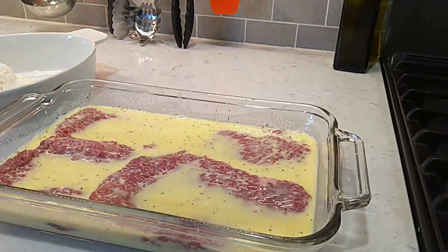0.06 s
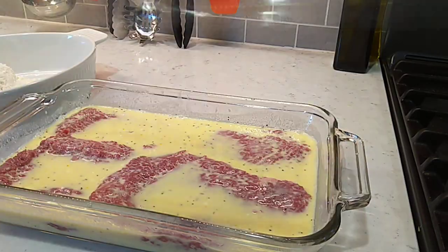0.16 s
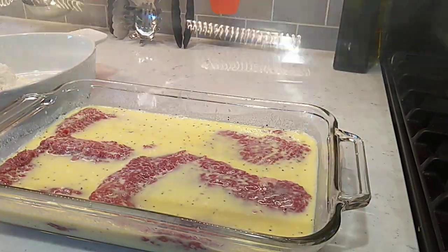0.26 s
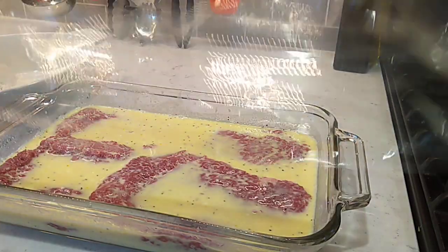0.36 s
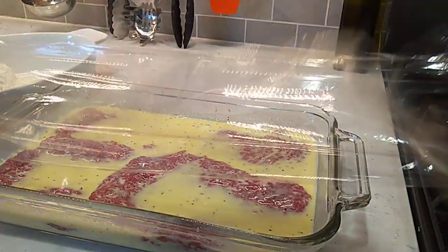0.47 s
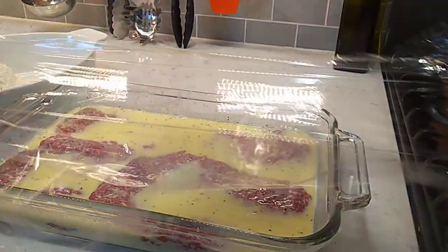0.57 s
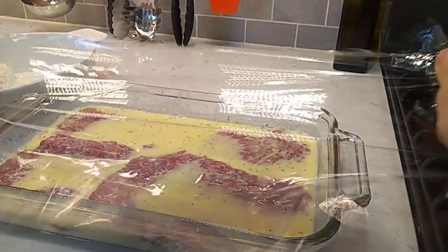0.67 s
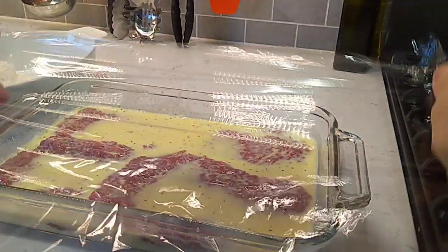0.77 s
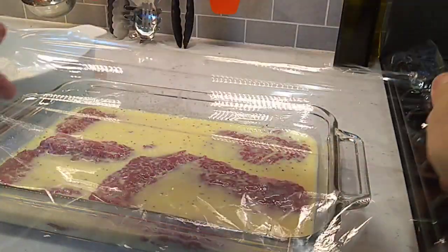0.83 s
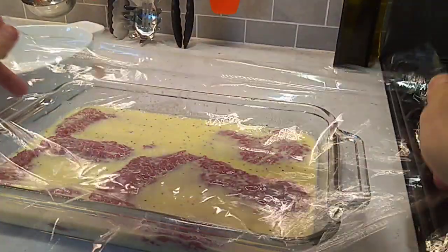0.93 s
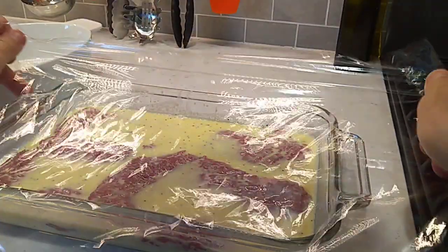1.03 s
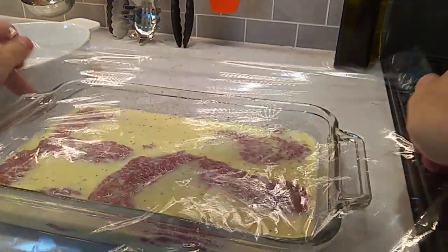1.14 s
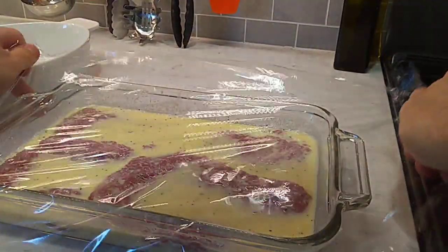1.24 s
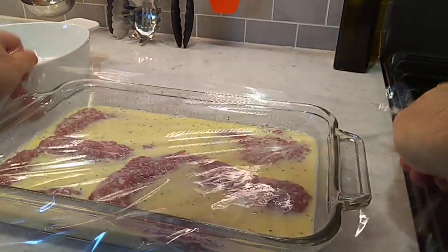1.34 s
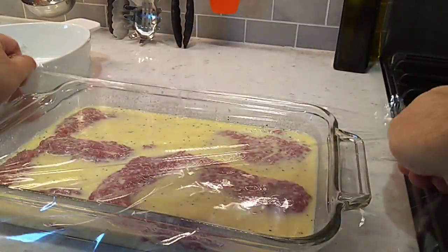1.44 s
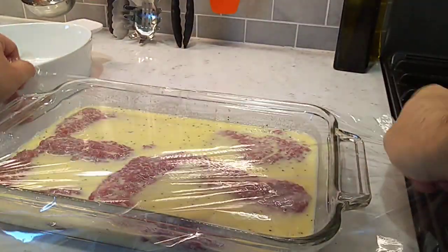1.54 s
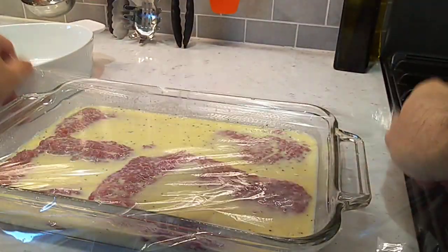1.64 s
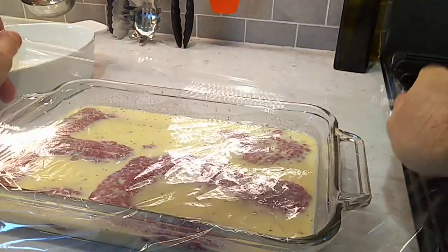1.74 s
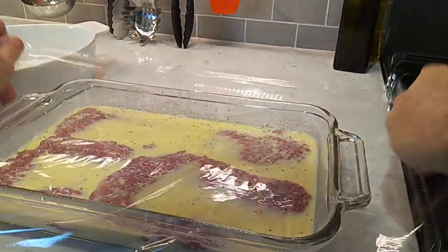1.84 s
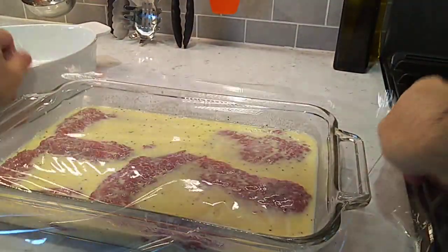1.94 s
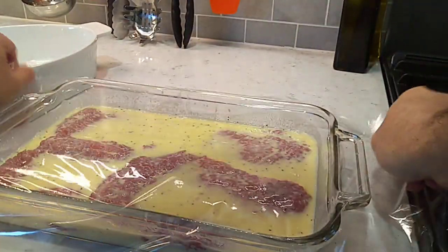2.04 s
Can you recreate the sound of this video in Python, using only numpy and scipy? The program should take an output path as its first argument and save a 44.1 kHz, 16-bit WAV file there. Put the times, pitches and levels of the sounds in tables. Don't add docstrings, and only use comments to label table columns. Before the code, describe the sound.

Plastic cling film crinkles with bright, fine fizz and dry snaps, close in stereo, over a low fridge hum in a hard kitchen. A sharp crack comes at 0.2 seconds, soft dish bumps at 0.4, 0.7 and 0.85, and denser crackling around 0.9-1.3 with a faint high whistle. A loud snap at 1.63 leads to crisp peels, a thud and hand scraping around 1.7-1.8, then lighter crackles until about 2 seconds.

```python
import sys
import numpy as np
from scipy import signal
from scipy.fft import rfft, irfft, next_fast_len
from scipy.io import wavfile
from scipy.ndimage import uniform_filter1d, map_coordinates

SR = 44100
rng = np.random.default_rng(int(sys.argv[2]) if len(sys.argv) > 2 else 0)


def to_linear_factor(level_db):
    exponent = np.asarray(level_db, float) / 20
    return 10 ** exponent


def transcribe(u):
    v = np.clip(np.atleast_2d(u).T, -1, 1)
    q = np.round(v * 32767).astype(np.int16)
    wavfile.write(sys.argv[1], SR, q)


N = 92610
T = np.arange(N) / SR

# (frequency [Hz], density [dB per Hz])
AIR_SPECTRUM = [(15, -36), (25, 4.5), (197, -3), (259, -2), (429, -3), (1050, -29), (1120, -24.5),
                (2880, -16), (6000, -18.5), (7800, -27), (13200, -120)]
# (frequency [Hz], left minus right [dB])
AIR_LEAN = [(60, -2), (240, 3.5), (950, 8.5), (3770, -2), (15000, 23)]
# (frequency [Hz], width [Hz], level [dB])
FRIDGE_HUM = [(59.7, 4.25, -62.5), (104, 12.3, -69.5), (203.5, 26, -65), (231.5, 22, -71.5),
              (313.5, 17, -66)]
# (frequency [Hz], correlation [-1..1])
MIC_LIKENESS = [(60, 0.5), (290, 0.97), (640, 0.4), (1400, 0), (15000, 0.0055)]
# (time [s], level [dB])
FILM_WORK = [(0.0, -51), (.06, -55), (0.15, -60), (.3, -58.5), (0.42, -56.5), (0.52, -65), (.68, -57),
             (.8, -61.5), (0.92, -52.5), (1.05, -49.5), (1.13, -51.5), (1.27, -52.5), (1.4, -59.5),
             (1.53, -59.5), (1.68, -53.5), (1.83, -55), (1.95, -56), (2.1, -52.5)]
# (frequency [Hz], density [dB per Hz])
FIZZ_SPECTRUM = [(880, -8), (1500, -13), (5640, -13.5), (6170, -8.5), (7540, -13), (13800, -0.5),
                 (15900, -15), (16500, -61)]
# (start [s], rise [s], hold [s], fall [s], level [dB], pitch [Hz])
SHUDDERS = [
    (0, .03, .08, 0.071, -67, 55.5),
    (0.208, 0.011, 0.017, .03, -56, 200),
    (1.713, 0.0091, 0.041, 0.066, -51.5, 240.8),
    (1.72, .04, .05, 0.042, -62, 69.9),
    (1.86, .05, 0.069, 0.055, -70, 60.2),
]
# (time [s], peak [dB], dull part re peak [dB], left minus right [dB])
SNAPS = [(0.0429, -33.5, -3.5, 9.5), (0.045, -38.5, 0, 7), (.1289, -34, -22, 15), (.214, -3, -16, -1),
         (0.2155, -24, -15, 4), (0.2319, -17.5, -9.5, 6), (0.265, -27.5, -6.5, 16), (0.2696, -24, -9.5, 9),
         (0.284, -30, -23, -7), (.288, -32, -20, -4), (.3398, -36, -15, 10), (0.3646, -34.5, -21, -9),
         (0.3656, -29.5, -10, 1), (.3875, -38, -9, -5), (0.5456, -32, -19, 12.5), (0.5565, -21, -19.5, 5),
         (.623, -46, -24, -13), (0.6494, -34, -15, -8), (.6636, -34, -7.5, 6), (0.6912, -28, -5.5, 2),
         (0.6952, -27, -15, 5), (.7044, -36, -13, 7.5), (0.9067, -29, -14, 15), (0.9153, -24, -14, 7),
         (0.922, -26, -13, -3), (0.9469, -19, -17, 2), (0.9773, -17, -29, 6), (1.0301, -25, -11, 11),
         (1.0388, -28.5, -0.5, -3), (1.0453, -20.5, -14.5, 11), (1.098, -21.5, -17, 0), (1.11, -23, -18, 5),
         (1.239, -25, -13, 7), (1.2736, -22.5, -18.5, 10.5), (1.2753, -24, -19, -2), (1.283, -33, -12, 0),
         (1.4695, -24.5, -23, 1), (1.552, -30, -8, -3), (1.558, -20.5, -22, -2), (1.5762, -26, -14, -3),
         (1.6011, -26, -24, -1), (1.6317, -9, -11, -2.5), (1.7004, -27, -28, 11), (1.7346, -19, -28, -4),
         (1.799, -32, -22, 16), (1.8064, -33, -16, 0), (1.842, -44, -15, -9), (1.974, -34, -7.5, 5),
         (1.9857, -23.5, -21, -1), (2.0056, -28, -22, 5)]
# (frequency [Hz], density [dB per Hz])
CRISP_SPECTRUM = [(3000, -39.5), (7000, -14), (9500, -8), (11500, -2.5), (13800, 1), (15500, -2),
                  (17200, -54)]
# (frequency [Hz], density [dB per Hz])
BROAD_SPECTRUM = [(300, -13), (900, -1.5), (2000, -2), (4000, 2), (6000, 2), (9000, -1), (12000, -66)]
# (time [s], level [dB])
KNOCKS = [
    (.384, -54.5),
    (.692, -56),
    (.84, -48),
    (1.7315, -42),
]
# (frequency [Hz], level [dB], T60 [s])
DISH_MODES = [(823, -4, 0.11), (1048, 4, 0.033), (1200, -21, 0.04), (418, 2, 0.035)]
# (time [s], pitch [Hz], level [dB])
TENSION = [(.4, 10600, -68), (.44, 11600, -63), (.5, 10800, -72), (.56, 11400, -62), (.63, 10100, -64),
           (.7, 10900, -60), (.79, 10900, -60), (.845, 11850, -56), (.92, 11100, -59), (1.0, 11600, -59),
           (1.09, 11800, -59), (1.16, 13500, -58), (1.25, 14200, -57), (1.35, 14050, -57),
           (1.41, 13500, -58), (1.46, 11900, -58), (1.54, 10000, -62), (1.6, 8800, -80)]
# (pitch ratio [1], width [Hz], level [dB])
WHISTLE_MODES = [(1, 140, 3), (1.085, 140, 4), (.93, 200, -2), (1.15, 200, -2), (1.04, 1500, 5)]
# (start [s], peak [dB], dull part re peak [dB], left minus right [dB], rise [s])
PEELS = [
    (0.6923, -39.5, -22, 11.5, 0.0027),
    (.8394, -63, -23, 12, .001),
    (1.052, -28.5, -29, -1, 0.0015),
    (1.7134, -12, -21.5, -1.5, 0.00075),
    (1.731, -10.5, -17.5, 1, 0.00046),
    (1.7902, -15, -23, 0, 0.00084),
    (1.7857, -19, -21, 6, .001),
    (1.9034, -26.5, -24, 4, 0.0012),
    (1.906, -30, -19, 0, .002),
    (2.066, -35, -25.5, 5, .003),
]
# (frequency [Hz], density [dB per Hz])
FLAP_SPECTRUM = [(100, -16.5), (250, -2.5), (700, -11.5), (1050, 2.5), (1500, -6), (3000, -2.5), (6500, -9),
                 (10000, -11.5)]
# (start [s], rise [s], hold [s], fall [s], level [dB])
DRAGS = [
    (.79, 0.054, 0.15, .1, -51.5),
    (1.012, 0.034, 0.022, 0.059, -57.5),
    (1.705, 0.013, 0.035, 0.21, -48.5),
    (1.884, .015, 0.0086, 0.031, -60),
]
# (frequency [Hz], density [dB per Hz])
DRAG_SPECTRUM = [(100, -4), (230, 3), (420, 4), (650, -4), (800, 0.5), (1200, -11), (3000, -9.5),
                 (6000, -23)]
# (frequency [Hz], T60 [s])
ROOM_DECAY = [(300, 0.33), (2000, 0.28), (14000, 0.18)]

AIR_DB = -59
CREASES_PER_S, CREASE_SPREAD_DB, CREASE_DB, HISS_DB = 900, 2.5, 2, 0
SNAP_DB, BROAD_DB, SNAP_RISE_S, SNAP_T60_S = 3, -8.5, 0.00036, 0.015
FLUTTER_DB, FLUTTER_T60_S = -14, 0.008
COUNTER_ECHO_S, COUNTER_ECHO_DB, MIC_LAG_S = 0.0007, -5, 0.0001
PEEL_DB, PEEL_T60_S, FLAP_DB, FLAP_T60_S = -7, 0.012, 8.5, 0.025
WHISTLE_PATCH_DB = 3.5
ROOM_DB, ROOM_GAP_S = -7.5, 0.0015
LOW_CUT_HZ = 42


def unit(x):
    return x / np.sqrt(np.mean(x ** 2) + 1e-20)


def along(points, hz):
    f, v = np.transpose(points)
    return np.interp(np.log(hz + 1), np.log(f + 1), v)


def wobble(knots_per_s):
    knots = rng.standard_normal(int(N * knots_per_s / SR) + 4)
    return map_coordinates(knots, [T * knots_per_s])


def fuzz(width_hz):
    return wobble(width_hz) + 1j * wobble(width_hz)


def stereo_noise():
    return rng.standard_normal((2, N))


def filtered(x, response):
    m = next_fast_len(N + 8192)
    return irfft(rfft(x, m) * response(np.fft.rfftfreq(m, 1 / SR)), m)[..., :N]


def paired(two, spectrum):
    grid_hz = np.linspace(0, SR / 2, num=4096)
    norm = np.sqrt(np.mean(to_linear_factor(along(spectrum, grid_hz)) ** 2))

    def response(hz):
        angle = np.arccos(np.clip(along(MIC_LIKENESS, hz), -1, 1)) / 2
        return to_linear_factor(along(spectrum, hz)) / norm * [np.cos(angle), np.sin(angle)]

    mid, side = filtered(two, response)
    return np.array([mid + side, mid - side])


def tinted(x, spectrum):
    def response(hz):
        cepstrum = irfft(np.log(to_linear_factor(along(spectrum, hz)) + 1e-6))
        causal = cepstrum * 2 * (np.arange(len(cepstrum)) < len(cepstrum) // 2)
        gain = np.exp(rfft(causal))[:len(hz)]
        padded = np.pad(gain, (0, len(hz) - len(gain)))
        return padded / np.sqrt(np.mean(abs(gain) ** 2))

    return filtered(x, response)


def trapezoid(start_s, rise_s, hold_s, fall_s):
    return np.interp(T, np.cumsum([start_s, rise_s, hold_s, fall_s]), [0, 1, 1, 0])


def bursts(rows, t60_s):
    shape = np.zeros((2, N))
    for s, db, pan_db, rise_s in rows:
        swell_db = -9 * ((T - s) / max(rise_s, 1e-4)) ** 2
        decay_db = -60 * (T - s) / t60_s
        shape_db = np.maximum(np.where(T < s, swell_db, decay_db), -150)
        shape += to_linear_factor(shape_db + db + np.array([[pan_db / 2], [-pan_db / 2]]))
    return shape


def kitchen():
    spectrum = [*AIR_SPECTRUM, (9000, -120)]
    air = to_linear_factor(AIR_DB) * paired(stereo_noise(), spectrum)
    hum = np.zeros(N)
    for hz, width_hz, db in FRIDGE_HUM:
        hum += to_linear_factor(db) * np.real((1 + 0.64 * fuzz(width_hz)) * np.exp(2j * np.pi * hz * T))
    return filtered(air + hum, lambda hz: to_linear_factor(along(AIR_LEAN, hz) * [[0.5], [-0.5]]))


def fizz():
    draws = rng.random(N)
    chance = CREASES_PER_S / SR * to_linear_factor(2.5 * wobble(60))
    flicks = (draws < chance) * to_linear_factor(CREASE_SPREAD_DB * rng.exponential(size=N))
    decay = to_linear_factor(-60 * T[:256] / 0.0042)
    creases = unit(signal.fftconvolve(flicks, decay)[:N] * stereo_noise())
    hiss = to_linear_factor(1.8 * wobble(11.24) + 0.37 * wobble(47)) * stereo_noise()
    work_db = np.interp(T, *np.transpose(FILM_WORK))
    return to_linear_factor(work_db) * paired(to_linear_factor(CREASE_DB) * creases + to_linear_factor(HISS_DB) * hiss, FIZZ_SPECTRUM)


def shudders():
    out = np.zeros(N)
    for start_s, rise_s, hold_s, fall_s, db, hz in SHUDDERS:
        thrum = np.real(fuzz(hz / 2) * np.exp(2j * np.pi * hz * T))
        out += to_linear_factor(db) * trapezoid(start_s, rise_s, hold_s, fall_s) * thrum
    return out * to_linear_factor([[1.5], [-1.5]])


def cracks(rows):
    out = np.zeros((2, N))
    for s, db, pan_db, _ in rows:
        lag, path = rng.uniform(size=2)
        for side, sign in enumerate((1, -1)):
            direct_s = s + sign * (lag - 0.5) * MIC_LAG_S
            echo_s = direct_s + COUNTER_ECHO_S * (0.8 + 0.5 * path)
            out[side, round(direct_s * SR)] = to_linear_factor(db + sign * pan_db / 2)
            out[side, round(echo_s * SR)] = to_linear_factor(db + COUNTER_ECHO_DB + sign * pan_db / 4)
    return out


def snaps_and_peels():
    snap = [(s, db + SNAP_DB, pan_db, SNAP_RISE_S) for s, db, dull_db, pan_db in SNAPS]
    broad = [(s, db + dull_db + BROAD_DB, pan_db, SNAP_RISE_S) for s, db, dull_db, pan_db in SNAPS]
    peel = [(s + rise_s, db + PEEL_DB, pan_db, rise_s) for s, db, dull_db, pan_db, rise_s in PEELS]
    flap = [(s + rise_s, db + dull_db + FLAP_DB, pan_db, rise_s) for s, db, dull_db, pan_db, rise_s in PEELS]
    white = [(1, 0)]
    crack = cracks(snap)
    rustle = to_linear_factor(FLUTTER_DB) * bursts(snap, FLUTTER_T60_S) + bursts(peel, PEEL_T60_S)
    crisp = crack + rustle * paired(stereo_noise(), white)
    body = bursts(broad, SNAP_T60_S) * paired(stereo_noise(), white)
    dull = bursts(flap, FLAP_T60_S) * paired(stereo_noise(), white)
    return tinted(crisp, CRISP_SPECTRUM) + tinted(body, BROAD_SPECTRUM) + tinted(dull, FLAP_SPECTRUM)


def dish():
    out = np.zeros(N)
    for s, db in KNOCKS:
        t = np.maximum(T - s, 0)
        onset = 1 - np.exp(-t / 0.0013)
        for hz, mode_db, t60_s in DISH_MODES:
            level_db = db + mode_db + rng.normal(0, 4.6)
            out += onset * to_linear_factor(level_db - 60 * t / t60_s) * np.sin(2 * np.pi * hz * t)
    return out * to_linear_factor([[1.5], [-1.5]])


def whistle():
    s, hz, db = np.transpose(TENSION)
    turns = np.cumsum(uniform_filter1d(np.interp(T, s, hz), size=900)) / SR
    out = np.zeros((2, N))
    for ratio, width_hz, mode_db in WHISTLE_MODES:
        for side in out:
            shake = to_linear_factor(WHISTLE_PATCH_DB * wobble(29.43)) * fuzz(width_hz)
            side += to_linear_factor(mode_db) * np.real(shake * np.exp(2j * np.pi * ratio * turns))
    return to_linear_factor(np.interp(T, s, db, left=-120, right=-120)) * out


def hands():
    shape = np.zeros(N)
    for start_s, rise_s, hold_s, fall_s, db in DRAGS:
        shape += to_linear_factor(db) * trapezoid(start_s, rise_s, hold_s, fall_s)
    return shape * paired(to_linear_factor(2.2 * wobble(34.96)) * stereo_noise(), DRAG_SPECTRUM)


def walls(x):
    hz, t, z = signal.stft(rng.standard_normal((2, SR // 2)), SR, nperseg=128)
    decay = to_linear_factor(-60 * t / along(ROOM_DECAY, hz)[:, None])
    tail = signal.istft(z * decay, SR, nperseg=128)[1]
    tail = np.pad(tail, ((0, 0), (int(ROOM_GAP_S * SR), 0))) / np.linalg.norm(tail[0])
    return signal.fftconvolve(x, tail, axes=1)[:, :N]


def scene():
    film = snaps_and_peels() + fizz() + whistle() + dish()
    return film + to_linear_factor(ROOM_DB) * walls(film) + hands() + kitchen() + shudders()


def top_cut(x):
    return signal.sosfilt(signal.butter(12, 16990, fs=SR, output="sos"), x)


def record(dry):
    mix = filtered(dry, lambda hz: (1j * hz / (LOW_CUT_HZ + 1j * hz)) ** 3)
    return top_cut(mix)


dry = scene()
out = record(dry)
transcribe(out)
```